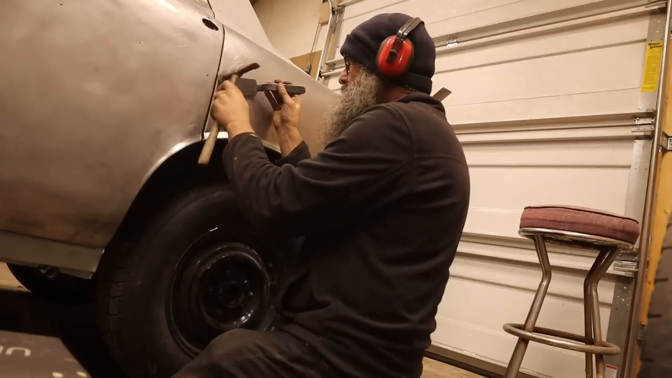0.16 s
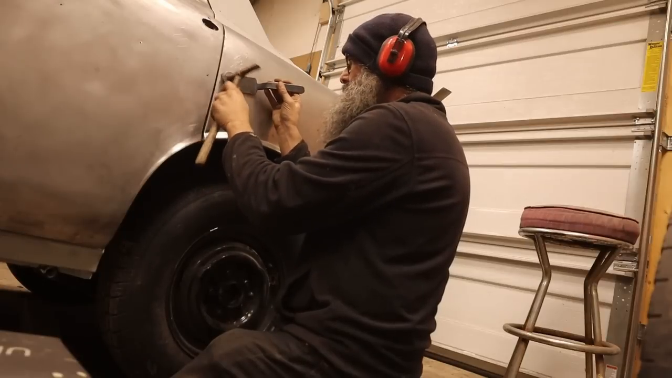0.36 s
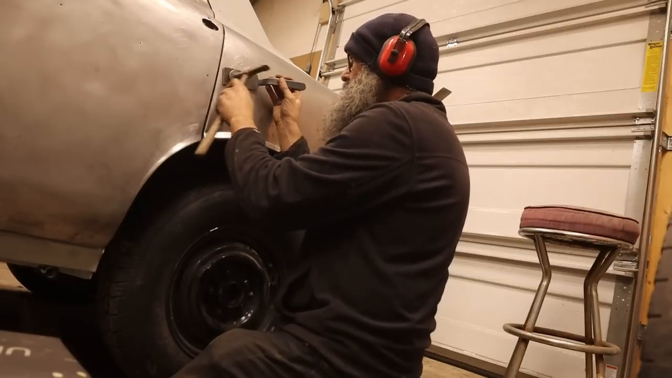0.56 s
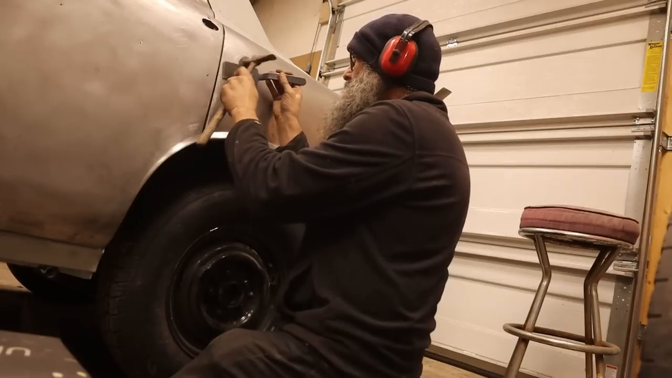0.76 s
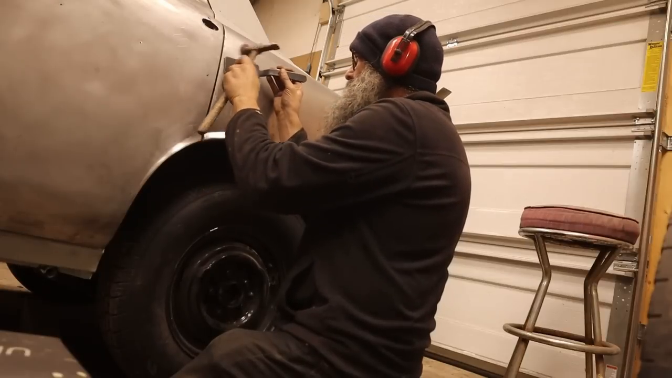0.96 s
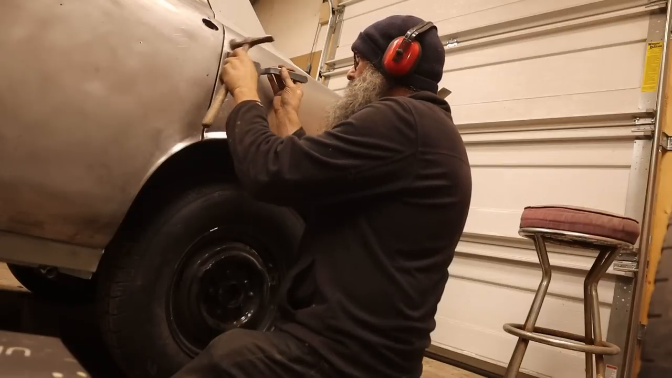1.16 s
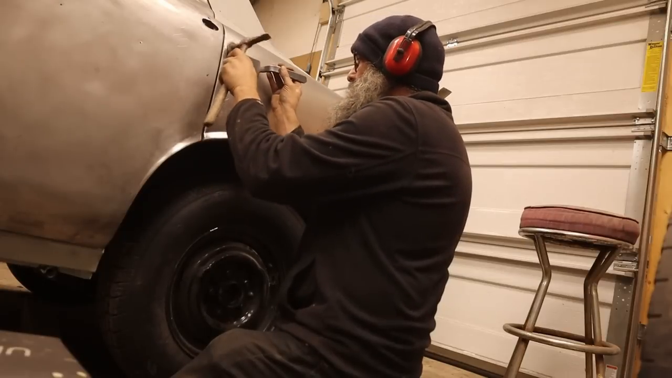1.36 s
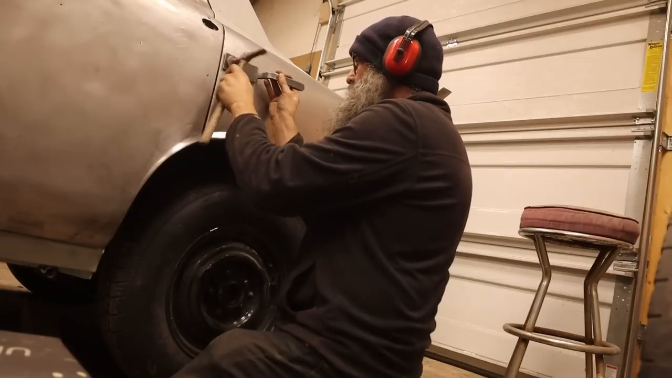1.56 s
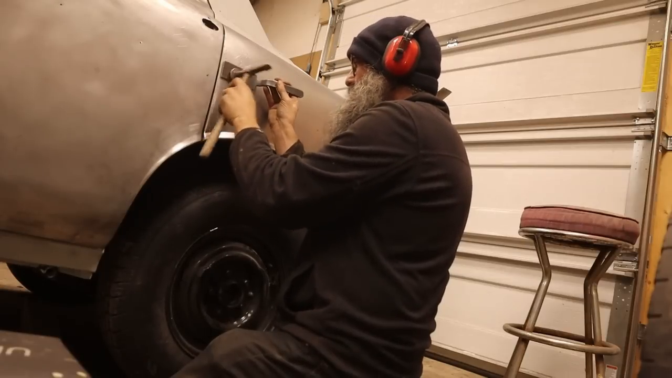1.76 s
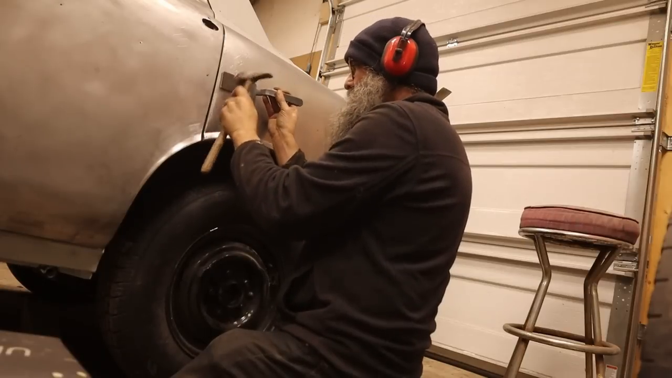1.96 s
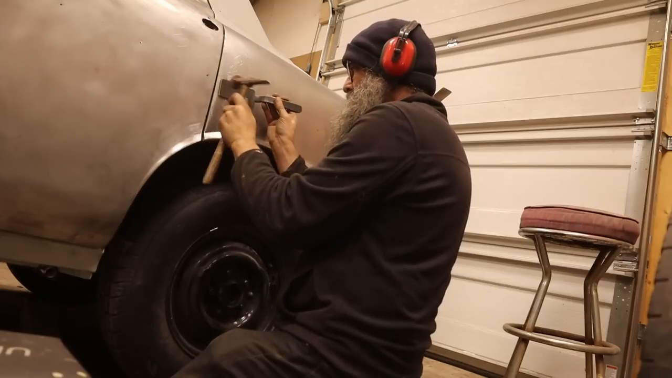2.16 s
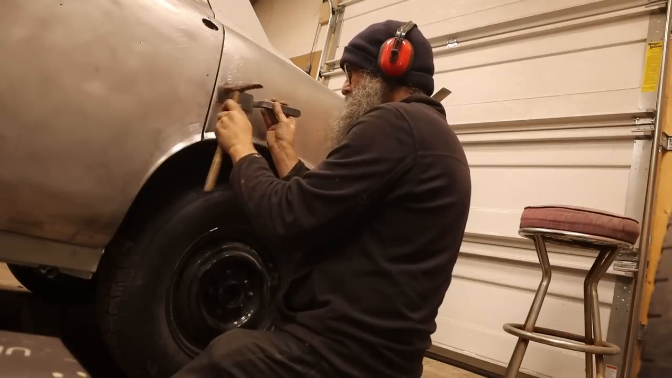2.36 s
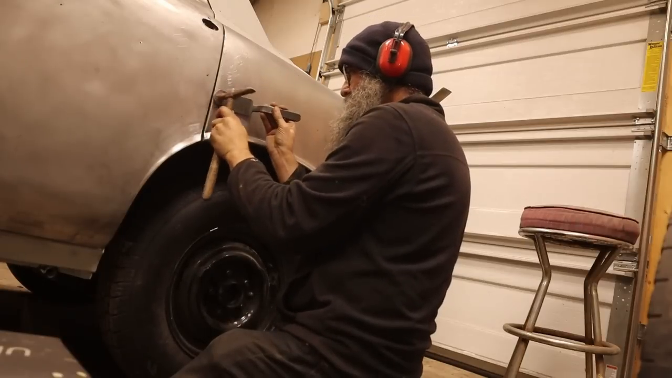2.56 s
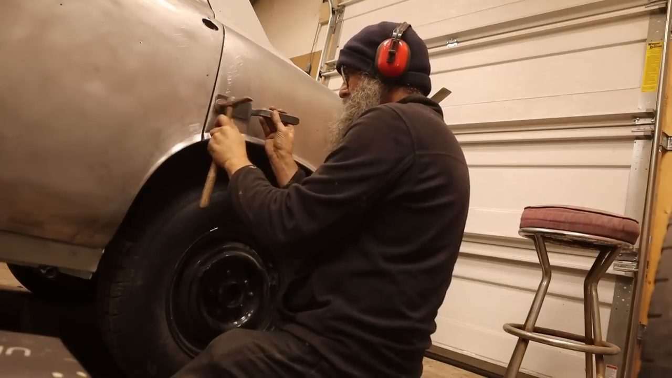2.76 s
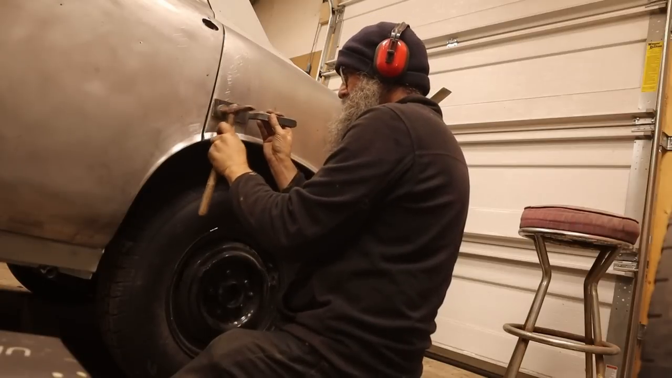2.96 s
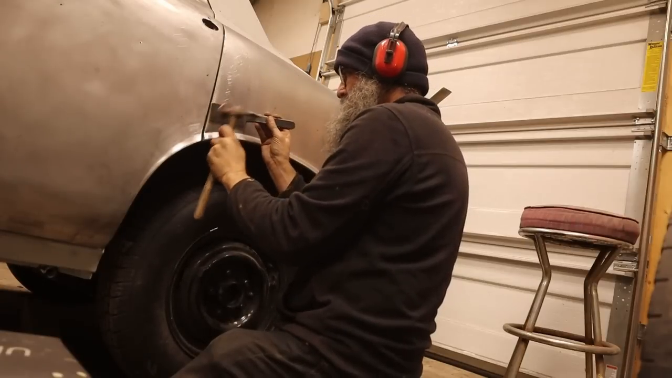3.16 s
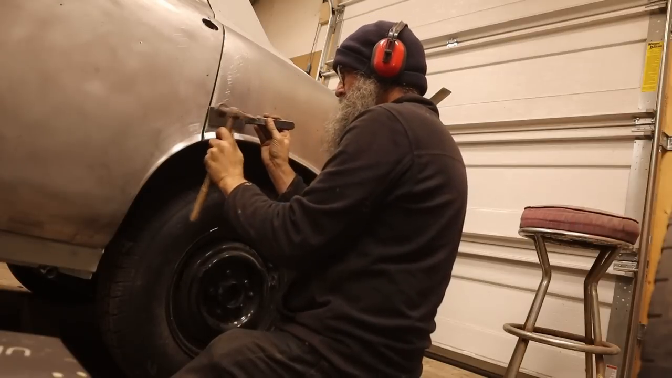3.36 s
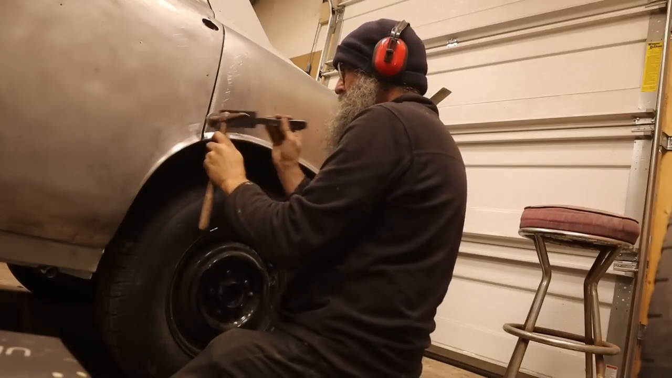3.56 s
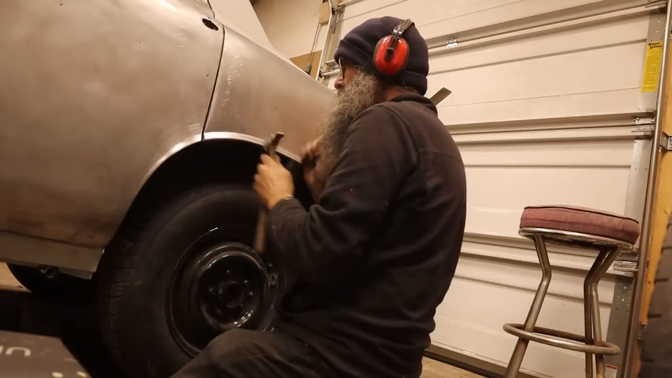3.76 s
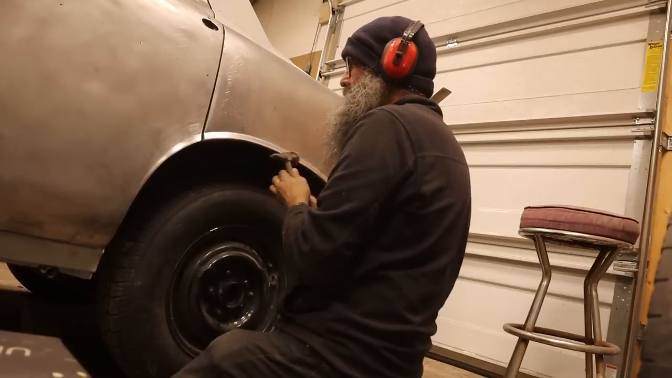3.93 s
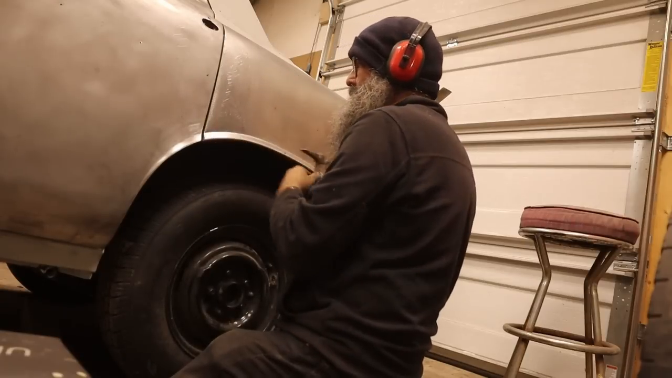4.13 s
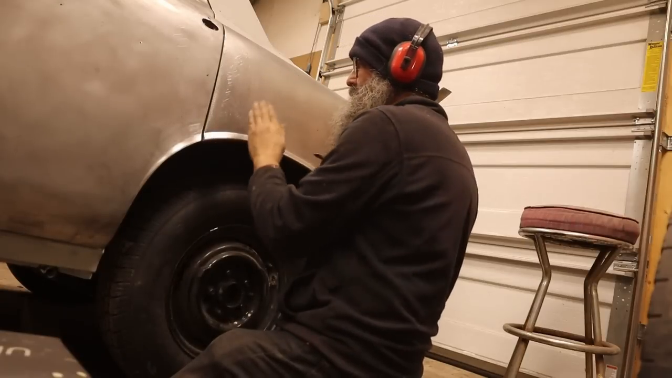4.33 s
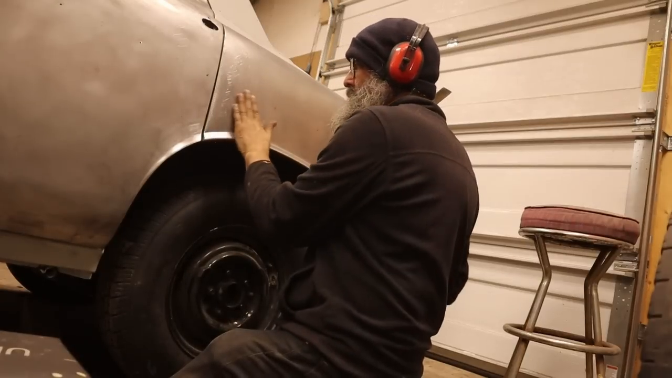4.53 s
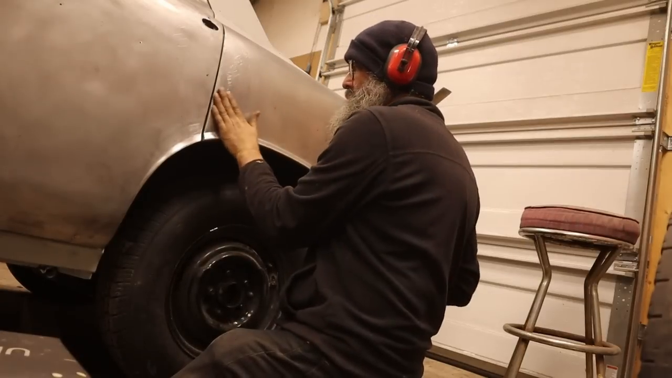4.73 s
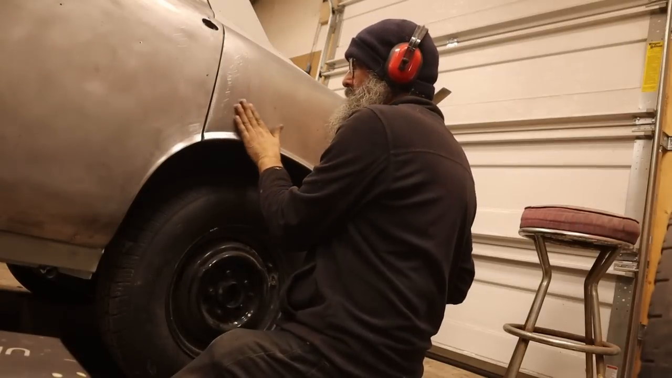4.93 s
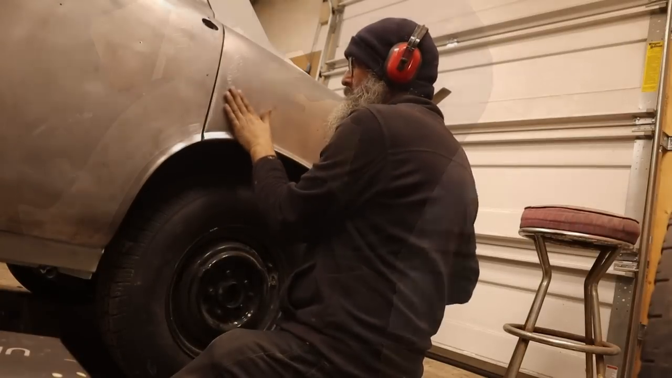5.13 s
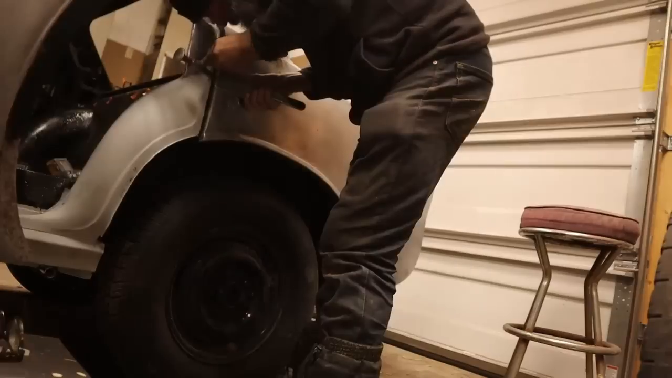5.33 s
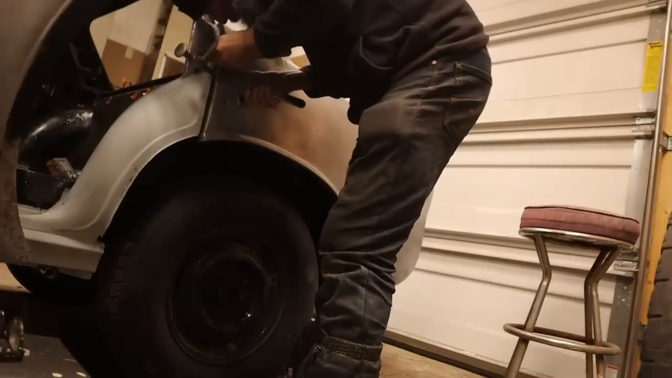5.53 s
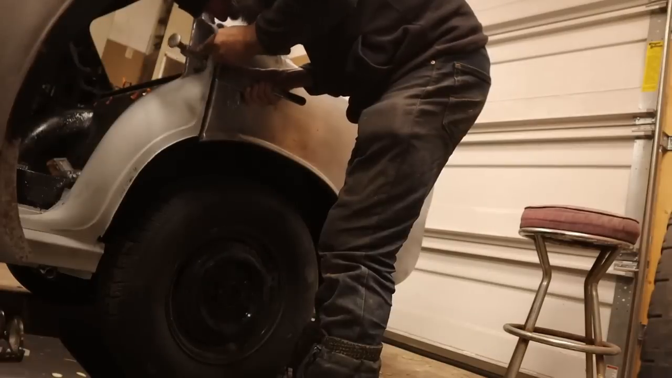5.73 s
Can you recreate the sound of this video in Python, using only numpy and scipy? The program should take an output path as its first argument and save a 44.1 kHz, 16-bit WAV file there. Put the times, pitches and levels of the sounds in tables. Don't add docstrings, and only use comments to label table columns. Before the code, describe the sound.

Steady, loud steel-on-steel taps ring a car's sheet-metal wing, varying in brightness, a few with a quick double tick from the bouncing block. A hollow hum lingers as hammering stops; a faint clink, soft hand thump and hissing strokes follow. A quick crossfade brings three softer, duller blows. Hard garage walls add a short tail; the pickup is thin in the bass.

```python
import sys
import numpy as np
from scipy import signal
from scipy.fft import rfft, irfft
from scipy.io import wavfile

SR = 44100
rng = np.random.default_rng(int(sys.argv[2]) if len(sys.argv) > 2 else 0)


def makeup_ratio(level_db):
    decades = np.asarray(level_db, float) / 20
    return 10 ** decades


def to_wav(s):
    ch = np.atleast_2d(s).T
    pcm = np.round(np.clip(ch, -1, 1) * 32767)
    wavfile.write(sys.argv[1], SR, pcm.astype(np.int16))


N = 255339
LEAD = 8820


def at_hz(points, hz):
    table_hz, value = np.transpose(points)
    return np.interp(np.log(hz + 1), np.log(table_hz), value)


def coloured(x, spectrum):
    gain = makeup_ratio(at_hz(spectrum, np.fft.rfftfreq(len(x), 1 / SR)))
    return irfft(rfft(x) * gain, len(x))


def noise(spectrum, size):
    x = coloured(rng.standard_normal(size), spectrum)
    return x / x.std()


def fall(t60, size):
    return makeup_ratio(-60 * np.arange(size) / SR / np.reshape(t60, (-1, 1)))


def swell(rise_s, size):
    return 1 - np.exp(-np.arange(size) / SR / rise_s)


def modes(hz, t60, size):
    phase = 2 * np.pi * np.reshape(hz, (-1, 1)) * np.arange(size) / SR
    return np.sin(phase) * fall(t60, size)


def hump(hz, centre_hz, octaves, db):
    return makeup_ratio(2 * db) * np.exp(-(np.log2(hz / centre_hz) / octaves) ** 2)


def add(track, s, sound):
    at = round(s * SR) + LEAD
    track[at:at + len(sound)] += sound[:len(track) - at]


# (time [s], block ping [dB], centre of the sheet's clang [Hz], block [Hz], hammer head [Hz])
HAMMER_BLOWS = [(0.1634, -8.5, 910, 3600, 7870), (0.407, -4.5, 846, 3820, 7270),
                (0.6476, -2.5, 980, 3900, 7900), (0.883, -7, 870, 3940, 7340),
                (1.1237, -9.5, 850, 4080, 7800), (1.3655, -17, 1480, 4060, 9400),
                (1.6073, -6.5, 1950, 3830, 7310), (1.8469, -3, 882, 4020, 7700),
                (2.0794, -0.5, 1550, 4245, 7940), (2.317, -2, 1540, 4060, 7700),
                (2.5565, -1, 730, 4010, 7770), (2.793, -1, 870, 4090, 7400), (3.034, -2, 2050, 4220, 8480),
                (3.272, -5, 2120, 5365, 8330), (3.5377, -1, 473, 3900, 7370)]
# (time after the blow [s], blow number, level under the blow [dB])
BLOCK_BOUNCES = [
    (.017, 2, -2),
    (.009, 6, -18),
    (.028, 7, -5.5),
    (.031, 8, -6),
    (.028, 9, -3),
    (.015, 9, -12.5),
    (.012, 10, -10.5),
    (.017, 14, -25.5),
]
# (frequency [Hz], level [dB], t60 [s])
SHELL_HUM = [(153.6, -13, 3.4), (247.5, -12, 0.82), (313, -2, 2.3), (373.6, -5.5, 1.4), (422, -14, 1.1),
             (442.3, -2.5, 2.8), (495, -3.5, 1.6), (532, -5.5, 1.5), (624, 2, 0.91)]
# (frequency [Hz], level [dB per Hz])
BODY_RUMBLE = [(60, -16.5), (160, -6), (440, -8.5), (650, -10), (1000, -28.5), (2500, -51.5)]


def blows():
    track, size = np.zeros(N + LEAD), 88200
    hz, hum_db, t60 = np.transpose(SHELL_HUM)
    shell = modes(hz, np.clip(t60, .5, 3), size)
    hits = [strike(*row) for row in HAMMER_BLOWS]
    for k, (blow, ping) in enumerate(hits + hits[:1]):
        s, crack_db, thud_db, sheet_db = blow[:4]
        if k == len(hits):
            s = -0.066
        hum = makeup_ratio(hum_db - 36.5) * rng.choice([-1, 1], len(hz)) @ shell
        rumble = makeup_ratio(sheet_db - 21.5) * noise(BODY_RUMBLE, size) * fall(2.63, size)[0]
        add(track, s, (hum + rumble) * swell(0.01, size))
        add(track, s, clang(blow, ping))
        add(track, s + 0.0022, thud(thud_db))
        add(track, s + 0.00089, tools(crack_db, ping))
        for after_s, number, under_db in BLOCK_BOUNCES:
            if number == k:
                add(track, s + after_s, makeup_ratio(under_db) * tools(crack_db, ping))
    return track


# (time [s], force of the swing [dB], give of the spot as thud [dB],
# stiffness as tilt [dB per octave], looseness of the grip [dB])
WORKED_SPOT = [
    (0.3, 0.5, -18, -1.7, -14),
    (0.7, -0.5, -24, 0.3, -6.5),
    (1.12, 0.5, -18, 0.3, -5),
    (1.5, -2.2, -18.5, -1, 6.5),
    (1.85, -1, -20.5, 1.5, -5),
    (2.2, 1.15, -27.5, 0.6, -1.5),
    (2.8, -4, -31.5, 1.1, -5.5),
    (3.1, -3, -25, -2.5, -3),
    (3.54, 0.5, -23.5, -3.5, -7.5),
]


def strike(s, block_db, clang_hz, block_hz, head_hz):
    times, *columns = np.transpose(WORKED_SPOT)
    crack_db, thud_db, stiff_db, loose_db = (np.interp(s, times, c) for c in columns)
    sheet_db = -15.5 + 0.3 * crack_db
    head_db = -15.5 - 0.2 * block_db
    upper_hz = 1.9 * head_hz
    blow = s, crack_db, thud_db, sheet_db, clang_hz, stiff_db, loose_db
    return blow, (block_db, block_hz, head_db, head_hz, upper_hz)


# (frequency [Hz], level [dB])
CRACK_TONE = [(60, -8.5), (200, 2), (1500, -15.5), (3400, -2.5), (8000, -1), (11500, -8.5), (13500, -4),
              (16000, -14)]


def tools(crack_db, ping):
    block_db, block_hz, head_db, head_hz, upper_hz = ping
    size = 4096
    crack_decay = fall(0.018, size)[0] + 0.21 * fall(0.066, size)[0]
    crack = makeup_ratio(crack_db - 6) * noise(CRACK_TONE, size) * crack_decay
    place = np.tile(np.arange(-3, 4), 3)
    hz = np.repeat([block_hz, head_hz, upper_hz], 7) * (1 + place * rng.uniform(0.023, .04, 21))
    cluster_db = np.repeat([block_db - 10.5, head_db + 0.5, crack_db - 16.5], 7)
    gains = makeup_ratio(cluster_db - 2.2 * np.sqrt(np.abs(place)))
    t60 = np.repeat([.045, .035, .03], 7)
    pings = gains * rng.choice([-1, 1], 21) @ modes(hz, t60, size)
    return (crack + pings) * swell(0.0001, size)


THUD_HZ = 169.5


def thud(thud_db):
    length_s, glide, hz_per_db = 0.027, 0.25, 2.5
    part = np.arange(round(length_s * SR)) / (length_s * SR)
    hz = (THUD_HZ + hz_per_db * (thud_db + 27)) * (1 + glide * (part - .5))
    return makeup_ratio(thud_db + 0.5) * np.sin(2 * np.pi * np.cumsum(hz) / SR) * np.sin(np.pi * part) ** 0.79


def ripple(hz, spacing_hz, spread_db):
    knots = np.arange(0, 18000, spacing_hz)
    return np.interp(hz, knots, spread_db * rng.standard_normal(len(knots)))


# (frequency [Hz], level [dB])
SHEET_TONE = [(40, -44), (110, -27), (250, -9.5), (600, -1.5), (2000, 0.5), (2600, -5), (3400, -17),
              (8000, -35)]
# (frequency [Hz], width [Hz], level above the rest [dB])
SHARED_STEEL = [(907, 84, 3.5), (1540, 120, 4), (2050, 24, 3), (4200, 470, 3.5), (6280, 89, 1.5),
                (7400, 300, 3.5), (8100, 460, 3), (10700, 670, 4.5), (12500, 250, 2.5), (13300, 300, -2.5)]
FREE_MODES = [3470, 4007, 4620, 5030, 6000, 6020, 7240, 8200, 8140, 10300, 10790, 12340, 13300, 15200]


def clang(blow, ping):
    s, crack_db, thud_db, sheet_db, clang_hz, stiff_db, loose_db = blow
    block_db, block_hz, head_db, head_hz, upper_hz = ping
    hz, size = np.geomspace(40, 17000, 4000), 44100
    tilt_db = stiff_db * np.clip(np.log2(hz / 900), -1.5, 1.5)
    low = makeup_ratio(2 * (sheet_db + 8.5 + at_hz(SHEET_TONE, hz) + tilt_db))
    low += hump(hz, clang_hz, 0.13, sheet_db + 11)
    low += hump(hz, THUD_HZ, .25, thud_db + 14.5)
    high = makeup_ratio(2 * (crack_db - 11.5 + 1.1 * stiff_db + at_hz(CRACK_TONE, hz)))
    high += hump(hz, block_hz, 0.073, block_db - 4)
    high += hump(hz, 1.22 * block_hz, .04, block_db - 10.5)
    high += hump(hz, head_hz, 0.047, head_db + 2)
    high += hump(hz, upper_hz, 0.04, crack_db - 18)
    for free_hz, chance in zip(FREE_MODES, rng.standard_normal(len(FREE_MODES))):
        free_db = loose_db - 11 - 1.1 * np.log2(free_hz / 6000) + 1.2 * chance
        high += hump(hz, free_hz * (1 + 0.0027 * chance), .012, free_db)
    shared_db = sum(db / (1 + ((hz - at) / width * 2) ** 2) for at, width, db in SHARED_STEEL)
    field = diffuse(size)
    low_db = 10 * np.log10(low) + shared_db + ripple(hz, spacing_hz=60, spread_db=2.6)
    high_db = 10 * np.log10(high) + shared_db + ripple(hz, spacing_hz=200, spread_db=2.7)
    low = coloured(field, np.c_[hz, low_db]) * swell(0.011, size)
    high = coloured(field, np.c_[hz, high_db]) * swell(0.0025, size) * swell(0.29, size)[::-1] ** 4
    return (low + high) * swell(0.12, size)[::-1] ** 4


# (time [s], level [dB], brightness [dB per octave])
EDGE_BLOWS = [
    (5.095, -7.5, -0.5),
    (5.3609, -7.5, 0.2),
    (5.611, -7, 0.22),
]
# (frequency [Hz], level [dB], t60 [s])
EDGE_RING = [(417, 4, 1.2), (442, -16, .8), (530, 1, 0.59), (576, -1, 0.75), (716, -3.5, 0.55),
             (794, 7.5, .8), (951, 3.5, 1.2), (980, -13.5, 0.56), (1229, 6, 0.35), (1370, 0.5, 0.39),
             (1504, -6, 0.78), (1766, 1, 0.73), (2250, 0, 0.216), (2410, -1.5, 0.35)]
# (frequency [Hz], level [dB per Hz])
EDGE_TONE = [(35, -52), (75, -20), (175, -13.5), (730, -3.5), (1700, -7), (2780, -16.5), (5080, -20.5),
             (15500, -38)]


def top_blows():
    track, size = np.zeros(N + LEAD), 44100
    hz, level_db, t60 = np.transpose(EDGE_RING)
    rings = modes(hz, np.clip(t60, .2, .5), size)
    for s, blow_db, bright_db in EDGE_BLOWS:
        field = coloured(diffuse(size), EDGE_TONE)
        field = makeup_ratio(13) * coloured(field, [(500, 0), (8000, 4 * bright_db)])
        ringing = makeup_ratio(level_db - 15) * rng.choice([-1, 1], len(hz)) @ rings
        crack = makeup_ratio(2.8 * bright_db - 4.5) * noise(CRACK_TONE, size) * fall(0.058, size)[0]
        sound = (field + ringing) * swell(0.0015, size) + crack * swell(0.0056, size)
        add(track, s, makeup_ratio(blow_db) * sound * swell(.1, size)[::-1] ** 2)
    return track


# (frequency [Hz], level [dB], t60 [s])
CLINK_RING = [(1550, 7, 0.041), (2097, -6, 0.039), (2990, 8, 0.061), (3290, -9, 0.57), (3950, -8, 0.46),
              (4474, -16, 0.23), (5329, -14, 0.25), (5959, -14, 0.55), (6480, -3, 0.06), (7200, -17, 0.2),
              (7860, -10, 0.28), (8700, -20, 0.081)]


def clink():
    track, s, clink_db = np.zeros(N + LEAD), 4.0185, -58
    hz, level_db, t60 = np.transpose(CLINK_RING)
    add(track, s, makeup_ratio(clink_db + level_db) @ modes(hz, t60, size=16384))
    scrape = noise([(700, -20.5), (1500, 9), (7000, 0), (10000, -22), (16000, -27)], size=1024)
    add(track, s, makeup_ratio(clink_db + 14) * scrape * fall(0.06, size=1024)[0])
    return track


def palm():
    track, size = np.zeros(N + LEAD), 16384
    thump = noise([(60, -14), (110, 6), (170, 11.5), (300, -3), (500, -15), (1500, -21.5), (4000, -36)], size)
    add(track, 4.525, makeup_ratio(-41) * thump * fall(0.5, size)[0] * swell(.01, size))
    return track


# (time [s], length [s], level [dB])
PALM_STROKES = [
    (4.531, 0.3, -69.5),
    (4.816, .253, -69.5),
    (5.07, 0.4, -65),
]
# (frequency [Hz], level [dB per Hz])
WIPE_TONE = [(300, -20), (1000, -1.5), (3000, -3.5), (7000, -1), (10500, -5), (13500, -5.5), (15800, -4.5)]


def wipe():
    track, stroke = np.zeros(N + LEAD), np.zeros(N)
    turn_db, turn_sharpness = 16, 3
    for s, length_s, stroke_db in PALM_STROKES:
        off_centre = np.abs(2 * (np.arange(N) / SR - s) / length_s - 1)
        slowing_db = turn_db * np.minimum(off_centre, 1) ** turn_sharpness
        stroke += makeup_ratio(stroke_db + 7 - slowing_db) * (off_centre < 1)
    add(track, 0, stroke * noise(WIPE_TONE, N))
    return track


# (frequency [Hz], t60 [s])
GARAGE_DECAY = [(100, 0.8), (260, 1), (700, 0.78), (1840, 0.56), (4850, 0.47), (12800, 0.23)]


def diffuse(size):
    edges = 42 * 2 ** (np.arange(0, 8.9, .5) + rng.uniform(.1, .5))
    white, tail = rng.standard_normal((2, size)), np.zeros(size)
    for k, (low, high) in enumerate(zip(edges, edges[1:])):
        band_pass = signal.butter(2, [low, high], "band", fs=SR, output="sos")
        band = signal.sosfilt(band_pass, white[k % 2])
        tail += band * fall(at_hz(GARAGE_DECAY, np.sqrt(low * high)), size)[0]
    return tail


def garage(x, wet_db):
    tail = makeup_ratio(wet_db) * diffuse(size=44100) * swell(.005, size=44100)
    return x + signal.fftconvolve(x, tail)[:len(x)]


# (frequency [Hz], level [dB per Hz])
FLOOR_TONE = [(40, -30.5), (62, -4), (150, 1), (300, -5.5), (440, -1), (600, -16.5), (1000, -24),
              (2500, -74.5)]


def room_floor():
    return makeup_ratio(-58.5) * noise(FLOOR_TONE, N)


# (start [s], end [s])
DISSOLVE = (5.165, 5.34)


def scene():
    handling = garage(clink() + palm() + wipe(), wet_db=-36.5)
    first = (blows() + handling)[LEAD:] + room_floor()
    share = np.interp(np.arange(N) / SR, DISSOLVE, [0, 1])
    return (first * np.sqrt(1 - share) + top_blows()[LEAD:] * share ** 0.8)[None]


def roll_off(x):
    return signal.sosfilt(signal.butter(12, 16760, fs=SR, output="sos"), x)


def record(dry):
    x = .95 * np.tanh(dry / .95)
    x = signal.sosfilt(signal.butter(2, 79, "high", fs=SR, output="sos"), x)
    x = signal.sosfilt(signal.cheby1(12, .5, 15750, fs=SR, output="sos"), x)
    return roll_off(x)


dry = scene()
out = record(dry)
to_wav(out)
```